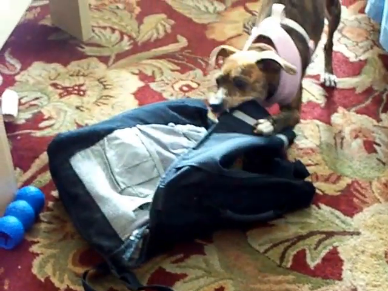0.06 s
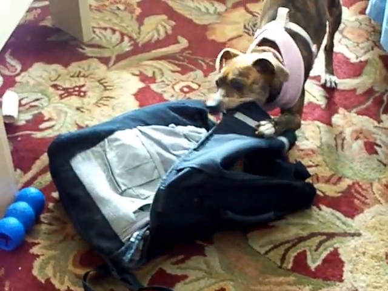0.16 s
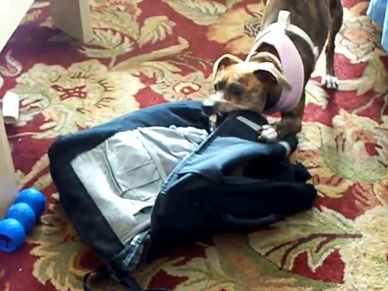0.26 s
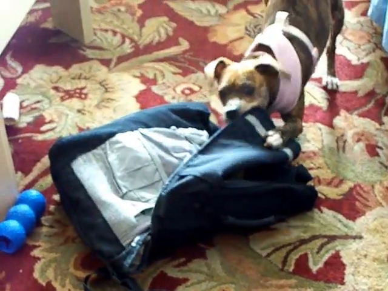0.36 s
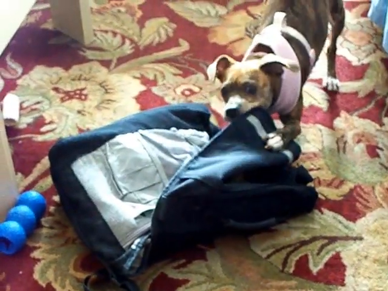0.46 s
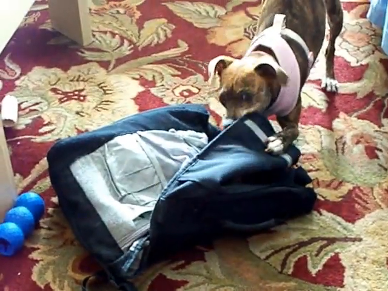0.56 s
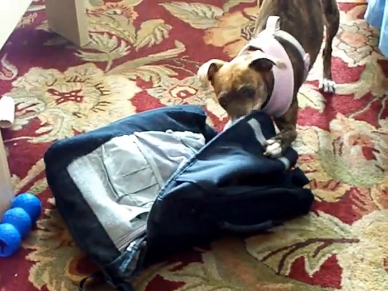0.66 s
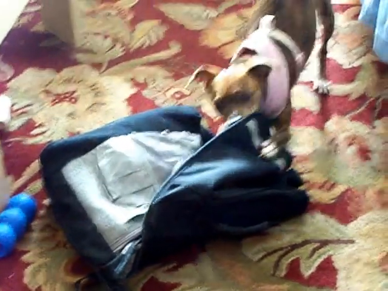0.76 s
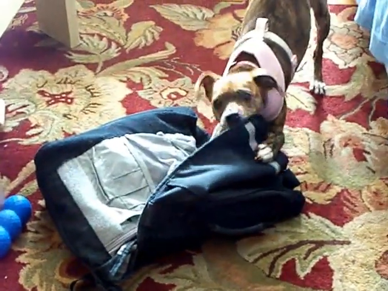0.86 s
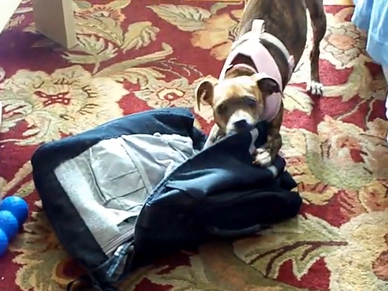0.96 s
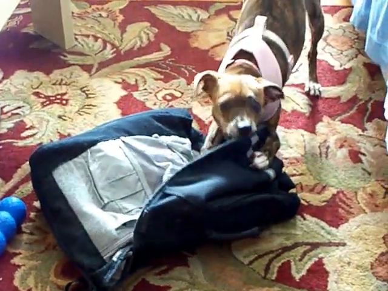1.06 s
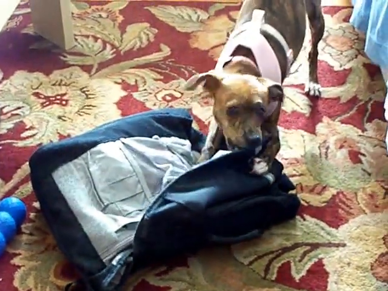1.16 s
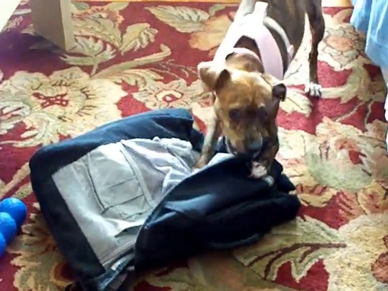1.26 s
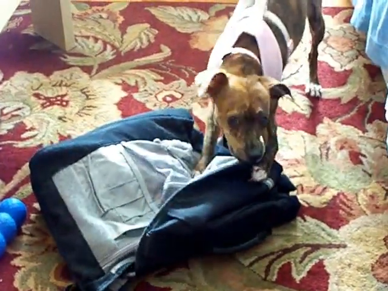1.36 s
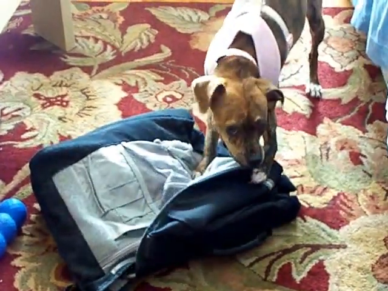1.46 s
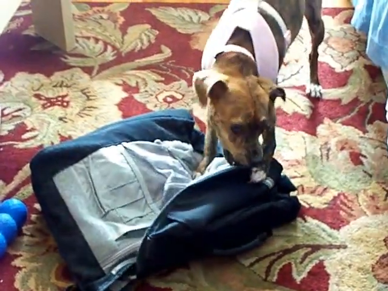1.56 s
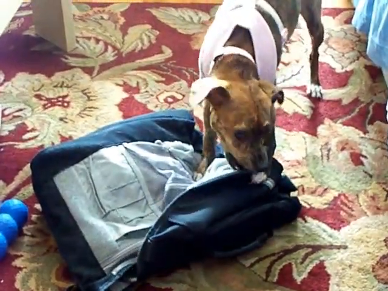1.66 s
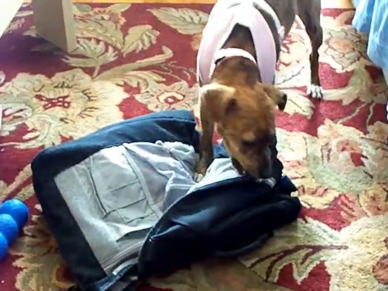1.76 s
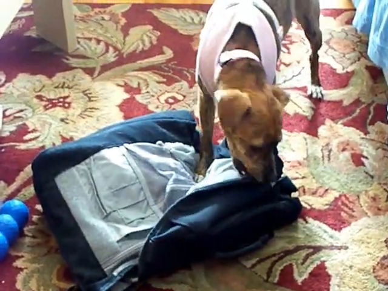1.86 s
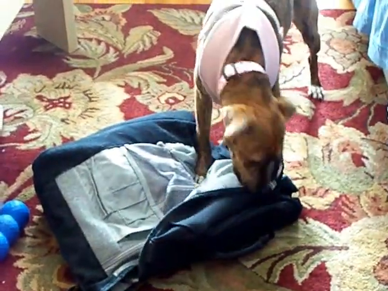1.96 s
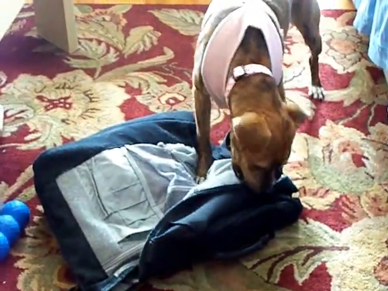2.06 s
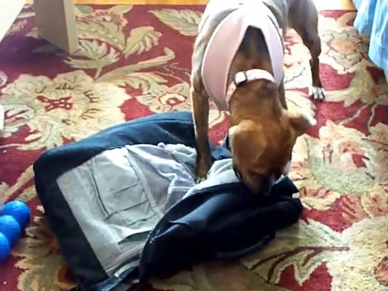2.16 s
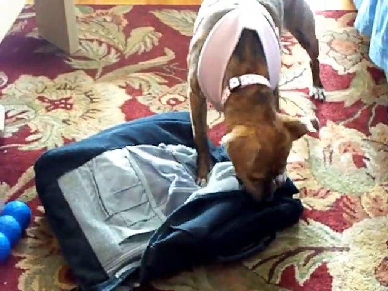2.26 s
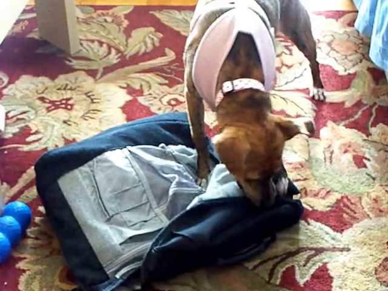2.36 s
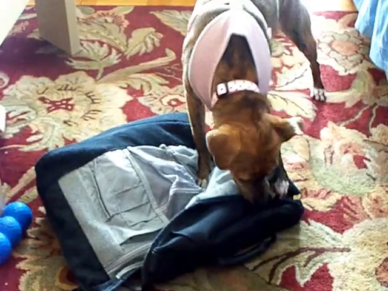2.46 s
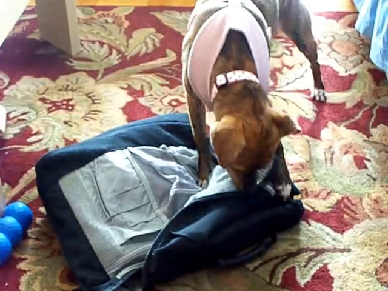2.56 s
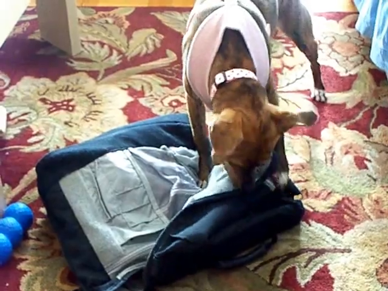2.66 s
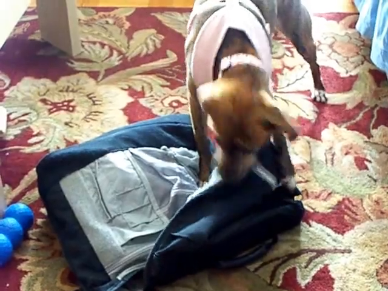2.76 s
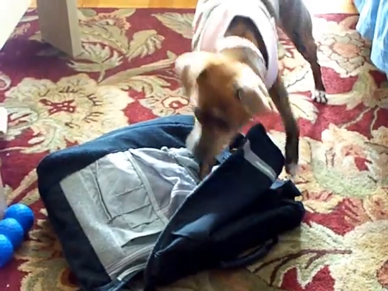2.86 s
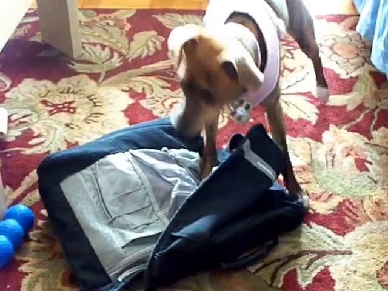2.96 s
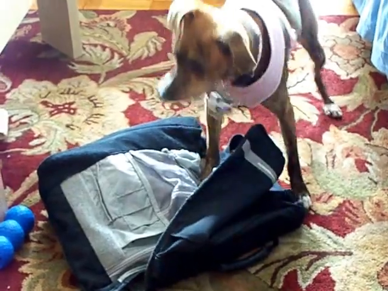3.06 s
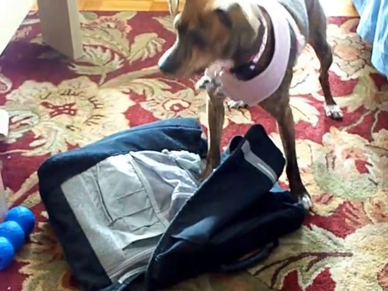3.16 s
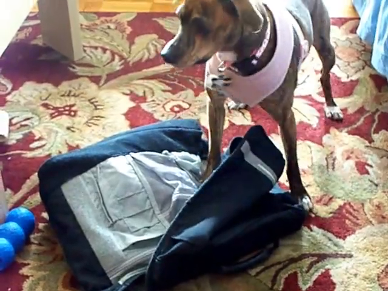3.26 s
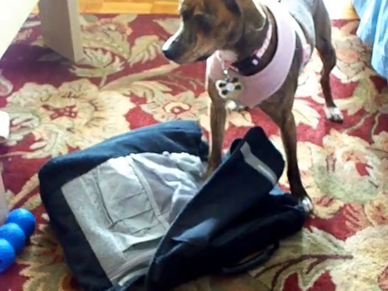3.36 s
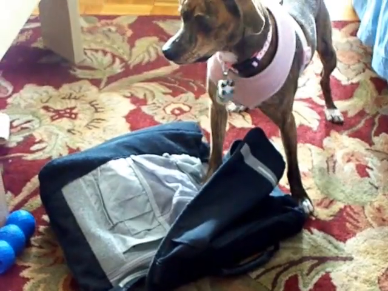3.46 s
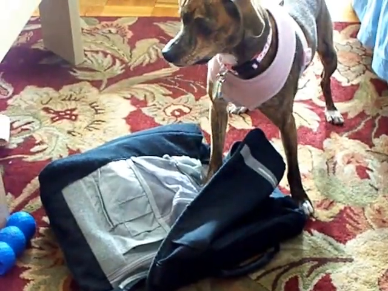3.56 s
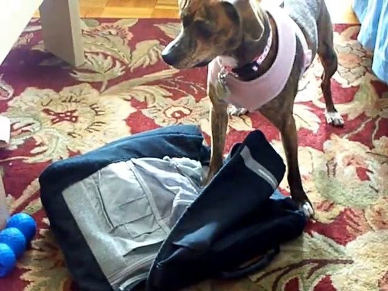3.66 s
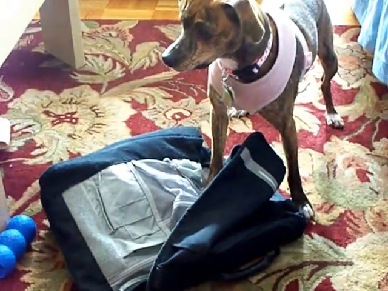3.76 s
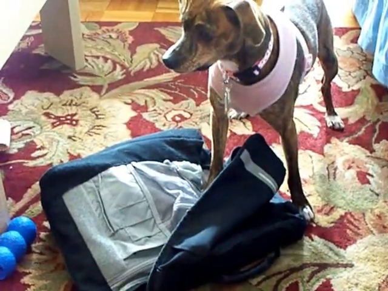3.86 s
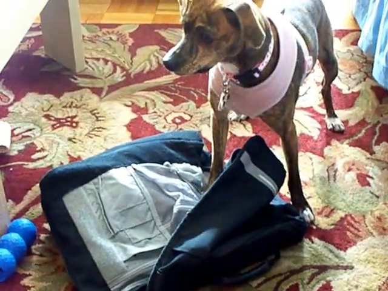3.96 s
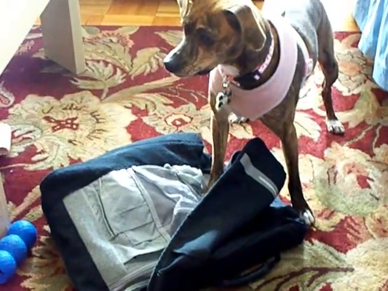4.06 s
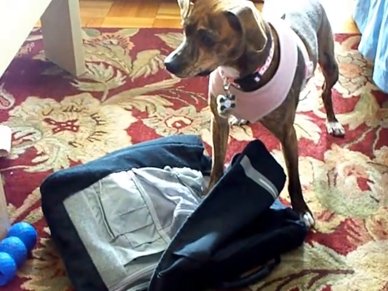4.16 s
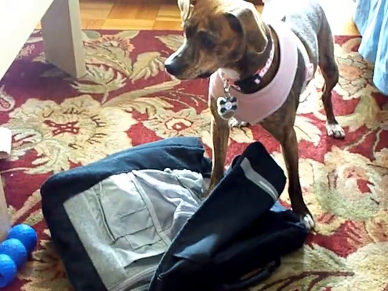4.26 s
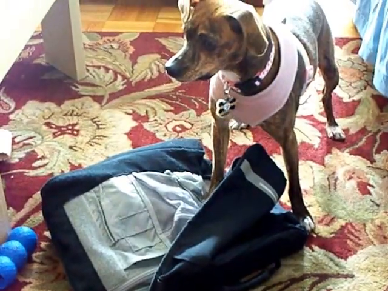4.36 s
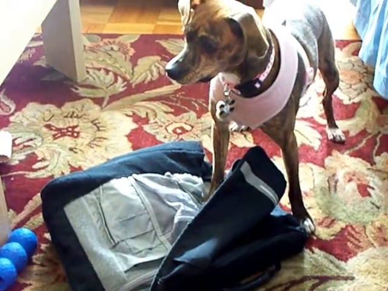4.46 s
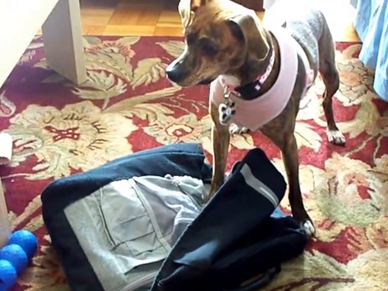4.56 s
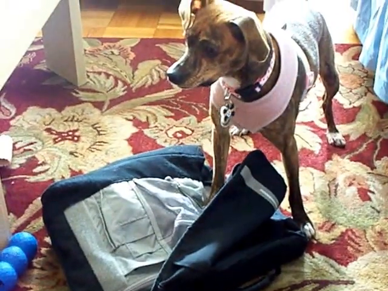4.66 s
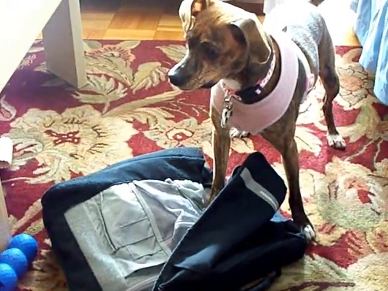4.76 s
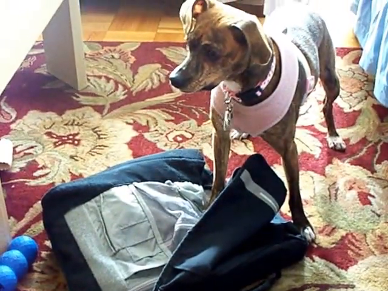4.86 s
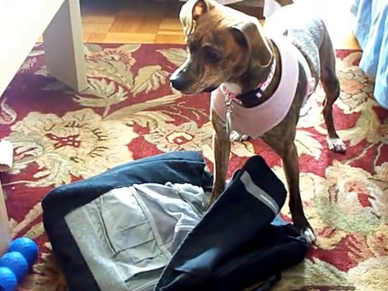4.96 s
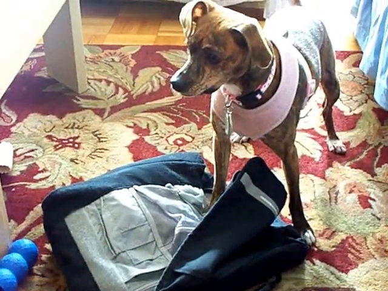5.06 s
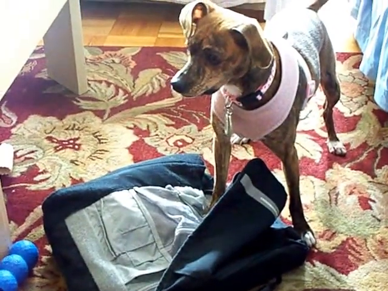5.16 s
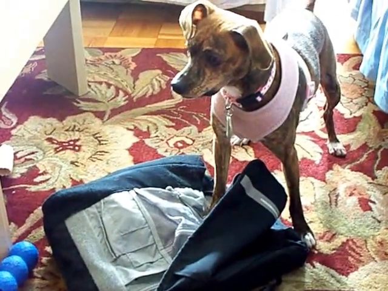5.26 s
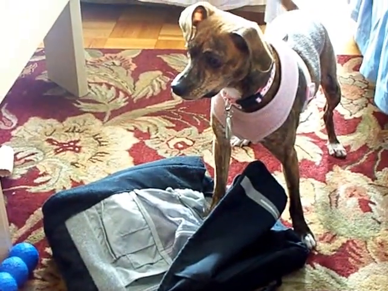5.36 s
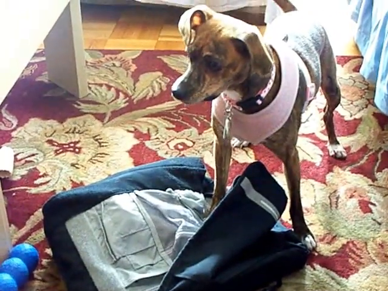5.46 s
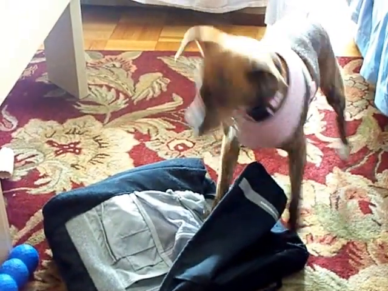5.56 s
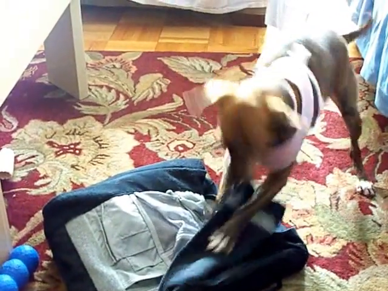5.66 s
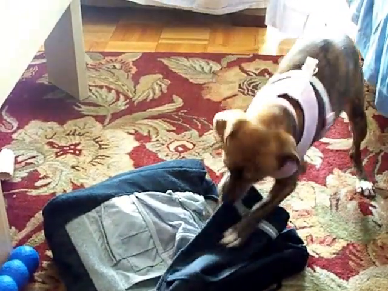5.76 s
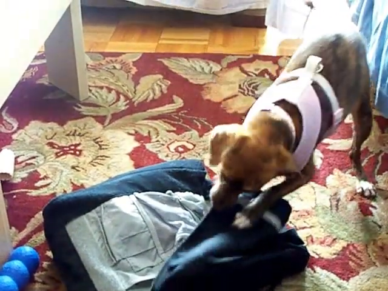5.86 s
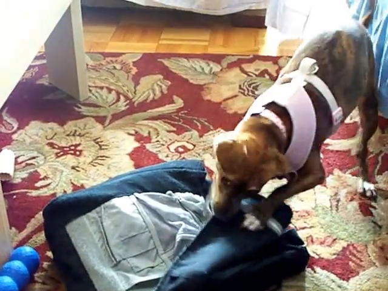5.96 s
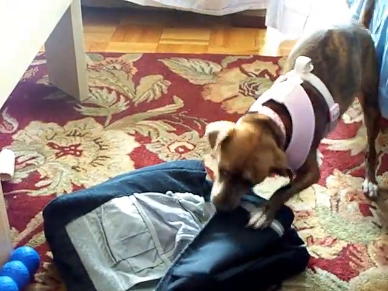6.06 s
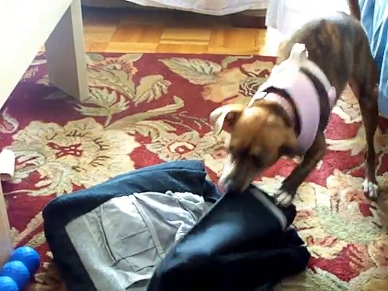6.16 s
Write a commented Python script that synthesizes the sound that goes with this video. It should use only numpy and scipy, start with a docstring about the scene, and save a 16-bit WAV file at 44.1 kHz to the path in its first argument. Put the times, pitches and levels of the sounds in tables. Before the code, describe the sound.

Quiet indoor scene on a hissy, thin phone microphone: fast light nibbling on cloth, tooth taps, dragging weave and crackling thread snaps nearby. A creaky hinge rises to a thin squeal at about the middle, then after a quieter gap answers with a falling, raspy squeak. Near the end come hard buckle taps, heavy cloth rustle and a wooden door bump with a short clatter.

```python
"""A small dog nibbles, tugs and paws a fabric bag: filtered noise grains crumple and scratch like cloth,
while decaying sines and short noise cracks make the taps of teeth and buckles and the snaps of threads.
Further off a dry hinge squeals open, then squeals back, as stacks of gliding, jittered overtones;
at the end the door bumps shut as a burst of noise over ringing modes. Throughout, a narrow-band phone
microphone adds hiss, hum, a thin whine and runs of faint low ticking."""
import sys
import numpy as np
from scipy import signal
from scipy.fft import rfft, irfft
from scipy.io import wavfile
from scipy.ndimage import uniform_filter1d

SR = 44100
rng = np.random.default_rng(int(sys.argv[2]) if len(sys.argv) > 2 else 0)


def wrap_up_sound(samples):
    """Save the sound to the file named by the first command line argument, as 16-bit audio."""
    columns = np.atleast_2d(samples).T
    # keep every value between -1 and 1, then stretch to whole-number steps
    tamed = np.clip(columns, -1, 1)
    steps = np.round(tamed * 32767).astype(np.int16)
    wavfile.write(sys.argv[1], SR, steps)


N = 273887
TIME = np.arange(N) / SR  # s
PHONE_RATE_HZ = 16000
NIBBLE_S = 0.023  # length of one nibble

# Tone of heavy, flapping folds: (frequency [Hz], relative level [dB])
FOLD_COLOUR = [(60, -33.5), (150, -7.5), (280, 3.5), (650, 0), (1100, -7.5), (2000, -23), (5000, -63)]
# Tone of buckling creases and of the crack in a knock: (frequency [Hz], relative level [dB])
CRUMPLE_COLOUR = [(300, -17.5), (900, -4.5), (1600, 3.5), (2700, -5.5), (3600, -5.5), (6000, -15.5)]


def undb(db):
    """Decibels to gain."""
    return 10 ** (np.asarray(db) / 20)


def unit(x):
    """Scale to rms 1."""
    return x / np.sqrt(np.mean(x ** 2))


def add(out, start_s, x):
    """Mix x into out from start_s, cutting what runs past the end."""
    i = max(int(start_s * SR), 0)
    out[i:i + len(x)] += x[:max(N - i, 0)]


def fade(t60):
    """Exponential decay, 60 dB in t60 seconds."""
    length = int(max(t60, .002) * SR * 2)
    return np.exp(-np.log(1000) * TIME[:length] / t60)


def colour(x, points):
    """Causal minimum-phase filter through (frequency [Hz], level [dB]) points."""
    size = 4096
    hz, db = np.transpose(points)
    f = np.maximum(np.arange(size // 2 + 1) * SR / size, 1)
    gain = undb(np.interp(np.log(f), np.log(hz), db))
    # folding the cepstrum onto positive time makes the filter minimum-phase
    cepstrum = irfft(np.log(gain))
    cepstrum[1:size // 2] *= 2
    cepstrum[size // 2 + 1:] = 0
    impulse = irfft(np.exp(rfft(cepstrum)))
    return signal.fftconvolve(x, impulse)[:len(x)]


def walk(rate_hz):
    """Smooth random wander of rms near 1, with rate_hz new targets a second."""
    hold = max(int(SR / rate_hz), 1)
    steps = np.repeat(rng.standard_normal(N // hold + 1), hold)
    return unit(uniform_filter1d(steps, hold)[:N])


def room(x, wet_db, t60):
    """Direct sound plus the diffuse tail of a furnished room, scaled to keep the total power."""
    decay = fade(t60)
    late = TIME[:len(decay)] > .004
    tail = rng.standard_normal(len(decay)) * decay * late
    wet = signal.fftconvolve(x, tail / np.linalg.norm(tail))[:N]
    return (x + undb(wet_db) * wet) / np.hypot(1, undb(wet_db))


def grains(length, rate_hz, spread_db):
    """Dense tiny clicks of fibres slipping, a few much larger than the rest."""
    size = undb(spread_db * np.minimum(rng.exponential(size=length), 5))
    slips = rng.random(length) < rate_hz / SR
    return slips * size * rng.standard_normal(length)


def push(length, attack_s=0.013, release_s=0.054, sag_db=5):
    """Pressure on the cloth: it rises fast, sags while held and lets go."""
    age = TIME[:int((length + .2) * SR)]
    rise = np.minimum(age / attack_s, 1)
    sag = undb(sag_db * (.5 - np.minimum(age / length, 1)))
    let_go = np.exp(-np.maximum(age - length, 0) * 2 / release_s)
    return rise * sag * let_go


def cloth(tugs, catch_db=2.5, pocket_db=2.06, flap_db=-6, crumple_db=-2.5, scratch_db=0.35):
    """Each tug flaps folds, buckles creases and, the more it slips, scratches the weave; all catch together."""
    # Tone of threads scratching past each other: (frequency [Hz], relative level [dB])
    weave_colour = [(1000, -3.5), (3000, -3.5), (5000, 2), (7000, 1), (8000, -0.5)]
    out, catch = np.zeros(N), undb(catch_db * walk(110))
    pocket_hz = np.geomspace(200, 8000, 18)
    for start_s, length, force_db, slip_db in tugs:
        pull = push(length) * undb(force_db)
        n = len(pull)
        flap = unit(colour(grains(n, 2500, 2.6), FOLD_COLOUR)) * undb(flap_db)
        creases = unit(colour(grains(n, 1400, 1.14), CRUMPLE_COLOUR)) * undb(crumple_db)
        scratch = unit(colour(grains(n, 7000, 1.37), weave_colour)) * undb(slip_db + scratch_db)
        # every pull shapes the bag anew, so its hollows resonate elsewhere
        pocket = np.column_stack([pocket_hz, pocket_db * rng.standard_normal(len(pocket_hz))])
        add(out, start_s, colour((flap + creases + scratch) * pull, pocket))
    return out * catch


def nibbles(rate_hz=15.5, jitter_s=.003, scatter_db=1):
    """Light tugs in quick, uneven succession, as rows that cloth() can play."""
    # Spells of nibbling and nosing: (start [s], end [s], mean force [dB], relative slip [dB])
    spells = [(0.062, 0.36, -57.5, -4), (0.576, 0.7, -63, 3.5), (0.929, 1.3, -53, -7.5),
              (1.544, 1.63, -57, -2.5), (3.015, 3.36, -55, 3)]
    rows = []
    for start, end, force_db, slip_db in spells:
        for beat_s in np.arange(start, end, 1 / rate_hz):
            late, size = rng.standard_normal(2)
            rows.append((beat_s + jitter_s * late, NIBBLE_S, force_db + scatter_db * size, slip_db))
    return rows


def paws(press_s=0.058):
    """A paw squashes the heavy folds with a dull flap."""
    # Paws pressing the folds flat: (time [s], relative weight [dB])
    steps = [(1.456, -53), (2.297, -55), (2.399, -46.5), (3.381, -53.5), (3.545, -50), (4.283, -56),
             (5.656, -48), (5.989, -40.5), (6.07, -46.5), (6.15, -46)]
    out, press = np.zeros(N), push(press_s)
    for start_s, weight_db in steps:
        flap = unit(colour(grains(len(press), 2500, 0.55), FOLD_COLOUR))
        add(out, start_s, undb(weight_db) * press * flap)
    return out


def teeth(bites, over_force_db=6, ring_hz=1430, spread=.12):
    """A little hollow click of tooth on cloth halfway through each nibble, as rows that taps() can play."""
    rows = []
    for start_s, _, force_db, _ in bites:
        hz = ring_hz * np.exp(spread * rng.standard_normal())
        rows.append((start_s + NIBBLE_S / 2, force_db + over_force_db, hz))
    return rows


def taps(knocks, cycles=26, upper_ratio=1.57, upper_db=-6, crack_t60=.012, crack_db=-6):
    """Little knocks: a crack and two modes that the cloth damps within a few dozen cycles."""
    out = np.zeros(N)
    for start_s, peak_db, hz in knocks:
        decay = fade(cycles / hz)
        age = TIME[:len(decay)]
        lower = np.sin(2 * np.pi * hz * age)
        upper = undb(upper_db) * np.sin(2 * np.pi * upper_ratio * hz * age)
        crack = unit(colour(rng.standard_normal(len(age)), CRUMPLE_COLOUR))
        crack *= np.exp(-np.log(1000) * age / crack_t60)
        knock = (lower + upper) * decay + undb(crack_db) * crack
        add(out, start_s, undb(peak_db) * knock / np.abs(knock).max())
    return out


def snaps(cracks, t60):
    """Sudden releases heard as short bright cracks of decaying noise."""
    # Tone of a crack: (frequency [Hz], relative level [dB])
    snap_colour = [(200, -18), (1000, -15.5), (2500, -6), (5000, 1.5), (7500, 6), (9000, -42)]
    out, decay = np.zeros(N), fade(t60)
    for start_s, peak_db in cracks:
        crack = colour(rng.standard_normal(len(decay)) * decay, snap_colour)
        add(out, start_s, undb(peak_db) * crack / np.abs(crack).max())
    return out


def hinge(drift=0.0027, flutter_db=2.0, grit=9, count=12, hold=0.58, sag_db=7.5, edge_s=0.0014):
    """Stick-slip of the pin: overtones settle on a new pitch at each grip; uneven slips break them into a rasp."""
    # Squeals: (start [s], length [s], first pitch [Hz], last pitch [Hz], settling time [s],
    # relative level [dB], overtone slope [dB per octave], jitter [share of the pitch])
    squeal_rows = [(2.603, 0.16, 638.4, 721, 0.37, -46, -1, .045),
                   (2.733, 0.039, 2727, 2664, 0.034, -43, -6.5, 0.0044),
                   (2.789, 0.025, 2815, 2990, 0.026, -41.5, -8, 0.022),
                   (2.799, 0.043, 3390, 3510, 0.017, -45, 6.5, .01),
                   (2.825, 0.15, 3687, 3830, .06, -44, 0, 0.0075),
                   (3.031, 0.2, 3908, 3838, 0.091, -43.5, -6, 0.0046),
                   (3.206, .17, 3780, 3994, 0.11, -50.5, -24, .002),
                   (3.155, 0.249, 1153, 1261, 0.202, -41.5, -22, .001),
                   (4.248, 0.057, 1980, 2222, 0.064, -59, -9, 0.015),
                   (4.451, 0.077, 3520, 3780, 0.02, -63, -17, .002),
                   (4.543, 0.021, 3420, 3340, 0.0091, -50.5, -0.5, .006),
                   (4.75, 0.062, 2965, 2493, 0.015, -48, -1, 0.0079),
                   (4.9, 0.037, 2520, 2160, .1, -55, -7, 0.01),
                   (4.914, .155, 1931, 1706, .028, -44.5, 0, 0.0098),
                   (5.06, 0.044, 1817, 2030, .02, -48.5, -3, 0.023),
                   (5.218, 0.11, 1752, 1593, 0.013, -49.5, 0.5, 0.005),
                   (5.300, 0.11, 1456, 1105, 0.46, -45, -2.5, 0.025),
                   (5.395, .095, 1065, 687, 0.17, -52.5, -4.5, .045)]
    # Tone of the hinge and what it hangs on: (frequency [Hz], relative level [dB])
    body_colour = [(400, -11), (700, 2.5), (1200, -2.5), (2200, 3.5), (2950, -0.5), (3200, 9), (3550, 2),
                   (5000, 2), (8000, -7.5)]
    out = np.zeros(N)
    wobble, grip, shake, chatter = walk(90), walk(140), walk(500), walk(1100)
    k = np.arange(1, count + 1)[:, None]  # overtone numbers
    for start_s, length, first_hz, last_hz, settle_s, level_db, slope, jitter in squeal_rows:
        span = (TIME >= start_s) & (TIME <= start_s + length)
        age = TIME[span] - start_s
        glide = np.expm1(-age / settle_s) / np.expm1(-length / settle_s)
        hz = first_hz + (last_hz - first_hz) * glide
        hz = hz * (1 + drift * wobble[span] + jitter * shake[span])
        # the level holds for a share of the length, then sags
        db = level_db - np.interp(age / length, [hold, 1], [0, sag_db])
        overtones = undb(slope * np.log2(k)) * (k * hz < PHONE_RATE_HZ / 2)
        phase = 2 * np.pi * k * np.cumsum(hz) / SR
        rms = np.sqrt(np.sum(overtones ** 2, axis=0) / 2)
        tone = np.sum(overtones * np.sin(phase), axis=0) / rms
        # ragged slips also differ in size, which fills the gaps between the overtones
        tone *= (1 + grit * jitter * chatter[span]) / np.hypot(1, grit * jitter)
        edges = np.clip(np.minimum(age, length - age) / edge_s, 0, 1)
        out[span] += tone * edges * undb(db + flutter_db * grip[span])
    return colour(out, body_colour)


def door(ring_db=2, crack_db=7, crack_t60=0.037):
    """Each bump against the frame rings panel and latch, with a clatter of wood on wood."""
    # Door meeting its frame and rattling: (time [s], relative level [dB])
    bumps = [(5.992, -35.5), (6.009, -46.5), (6.020, -40.5)]
    # Resonances of door and latch: (frequency [Hz], relative level [dB], decay by 60 dB [s])
    modes = [(237, -16.5, 0.45), (298, -22, 0.26), (428.4, -13.5, 0.14), (497, -6, 0.13), (634, -6, 0.35),
             (2022, 6.5, 0.031), (2124, -6, 0.054), (2500, -12, 0.073), (2860, 0, 0.028)]
    # Tone of the clatter: (frequency [Hz], relative level [dB])
    crack_colour = [(150, -2), (400, -16.5), (1000, -24), (2800, 5), (4000, -14), (6700, 3), (8000, -23.5)]
    out, decay = np.zeros(N), fade(crack_t60)
    for start_s, level_db in bumps:
        crack = colour(decay * rng.standard_normal(len(decay)), crack_colour)
        add(out, start_s, undb(level_db + crack_db) * crack)
        for hz, db, t60 in modes:
            envelope = fade(t60)
            ring = envelope * np.sin(2 * np.pi * hz * TIME[:len(envelope)])
            # each mode starts up to one cycle late
            add(out, start_s + rng.random() / hz, undb(level_db + ring_db + db) * ring)
    return out


def ticking(ring_hz=260, width_s=0.003, first_db=-47, second_db=-49, gap_s=.032, scatter_db=2.0, detune=0.16):
    """Soft, rounded electrical ticks in pairs, ten pairs a second, no two quite alike."""
    # Runs of ticking: (start [s], end [s])
    runs = [(0.058, 4.9), (4.943, 5.3), (5.328, 6.2)]
    out, age = np.zeros(N), TIME[:SR // 100] - 1 / 200  # the tick peaks at age 0
    for start, end in runs:
        for pair_s in np.arange(start, end, 1 / 10):
            for lag, db in ((0, first_db), (gap_s, second_db)):
                size, pitch = rng.standard_normal(2)
                hz = ring_hz * (1 + detune * pitch)
                tick = np.exp(-(age / width_s) ** 2) * np.cos(2 * np.pi * hz * age)
                add(out, pair_s + lag, -tick * undb(db + scatter_db * size))
    return out


def background(hiss_db=-59):
    """Room rumble and microphone hiss as coloured noise, mains hum and a thin whine as steady sines."""
    # Tone of rumble and hiss: (frequency [Hz], relative density [dB per Hz])
    hiss_colour = [(25, -19), (60, 0), (110, -5.5), (220, -2.5), (330, 1.5), (480, -2), (900, -4.5),
                   (1800, -12), (3200, -17.5), (5500, -16), (8000, -22.5)]
    # Hum and whine: (frequency [Hz], rms level [dB])
    steady_tones = [(59.5, -79), (7827, -75.5)]
    hiss = undb(hiss_db) * unit(colour(rng.standard_normal(N), hiss_colour))
    tones = sum(undb(db) * np.sqrt(2) * np.sin(2 * np.pi * hz * TIME) for hz, db in steady_tones)
    return hiss + tones


def scene():
    """The bag is close and drier; the hinge and door are heard through more of the room."""
    # Tugs at the bag: (start [s], length [s], force [dB], relative slip [dB]);
    # slip is high when the weave slides fast, low when it only creases
    tug_rows = [(1.117, 0.11, -60, 4), (1.312, 0.033, -47.5, -0.5), (1.392, .04, -48, -1.5),
                (1.456, 0.054, -51.5, 2), (1.728, 0.047, -49, 7.5), (1.83, 0.45, -60, 4.5),
                (2.035, 0.029, -50.5, 2.5), (2.236, 0.12, -54.5, 2), (2.297, .17, -53.5, 4.5),
                (2.399, 0.03, -47, 8.5), (2.62, .16, -49.5, 9), (2.931, 0.045, -54, 1),
                (3.536, 0.04, -53, -1), (3.694, 0.026, -52, -5), (5.647, 0.068, -46.5, -2.5),
                (5.732, 0.11, -50, 9), (5.85, .33, -52.5, 3), (5.989, 0.27, -47, -4),
                (6.144, 0.043, -49, -4.5)]
    # Teeth, buckles and paws knocking, before the room: (time [s], peak level [dB], ring [Hz])
    knock_rows = [(0.071, -39.5, 1360), (0.261, -40.5, 1450), (0.401, -31.5, 1316), (0.702, -34.5, 1206),
                  (1.327, -35.5, 1540), (2.300, -28, 1091), (3.398, -36, 427), (3.401, -36.5, 1329),
                  (3.704, -37, 1550), (5.651, -34, 724), (5.659, -40.5, 1560), (5.676, -23.5, 1594),
                  (5.678, -34, 240), (5.685, -30.5, 810), (5.808, -30, 1620)]
    # Claws and threads snapping over the weave, before the room: (time [s], peak level [dB])
    snap_rows = [(0.198, -44.5), (0.351, -45), (1.156, -36.5), (1.339, -34), (1.878, -35.5), (1.906, -34),
                 (1.937, -27), (2.239, -37), (2.265, -39.5), (2.367, -30), (2.409, -22), (2.419, -34),
                 (2.440, -29.5), (2.446, -26), (5.624, -32), (5.631, -30.5), (5.675, -26), (5.734, -25.5)]
    # Hinge pin jumping between squeals, before the room: (time [s], peak level [dB])
    jump_rows = [(4.916, -38), (5.067, -34.5), (5.089, -44.5), (5.299, -49)]
    bites = nibbles()
    bag = cloth(tug_rows + bites) + paws()
    bag += taps(knock_rows + teeth(bites)) + snaps(snap_rows, t60=0.0068)
    near = room(bag, wet_db=-5.5, t60=0.49)
    squeals = room(hinge() + snaps(jump_rows, t60=0.017), wet_db=-0.5, t60=0.37)
    shut = room(door(), wet_db=1, t60=0.37)
    return (near + squeals + shut + ticking() + background())[None]


def record(dry, top_hz=10100):
    """The phone samples slowly, so the top of its band is mirrored upward; its port cuts a deep notch."""
    # Response of the microphone port: (frequency [Hz], level [dB])
    port_colour = [(20, -1.5), (2700, 2.5), (3300, -2), (3800, -9), (4050, -17), (4250, -21), (4550, -10),
                   (5100, -2.5), (6500, 2.5), (7500, 3.5), (8700, -6.5), (9300, -17.5), (10000, -35.5)]
    in_band = np.arange(N // 2 + 1) * SR / N < PHONE_RATE_HZ / 2
    band = irfft(rfft(dry) * in_band, N)[0]
    mirrored = band * (1 + 2 * np.cos(2 * np.pi * PHONE_RATE_HZ * TIME))
    low_pass = signal.ellip(10, .2, 80, top_hz, fs=SR, output="sos")
    return signal.sosfilt(low_pass, colour(mirrored, port_colour))[None]


dry = scene()
out = record(dry)
wrap_up_sound(out)
```